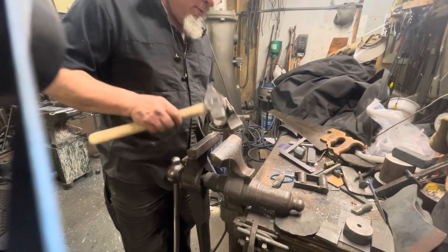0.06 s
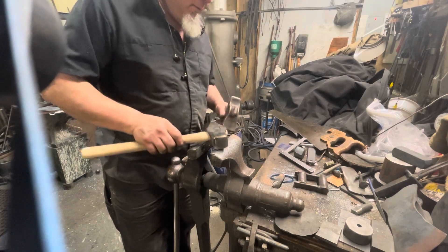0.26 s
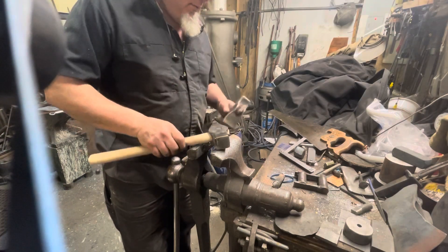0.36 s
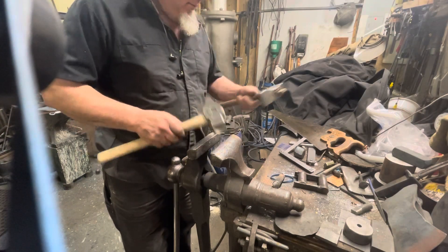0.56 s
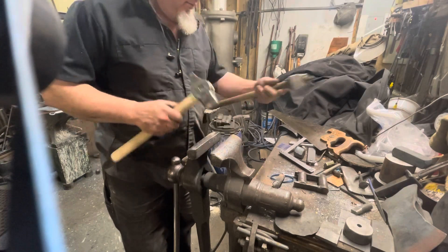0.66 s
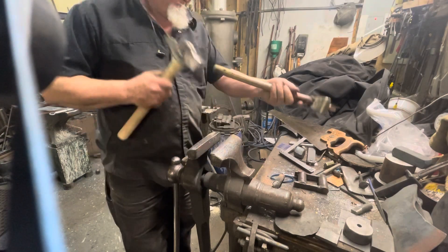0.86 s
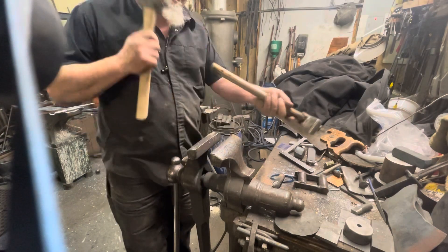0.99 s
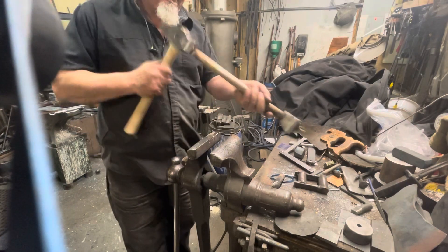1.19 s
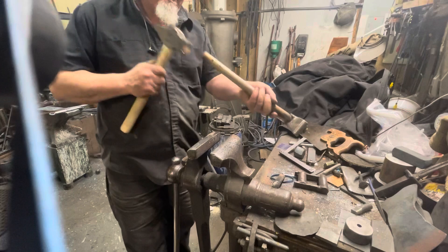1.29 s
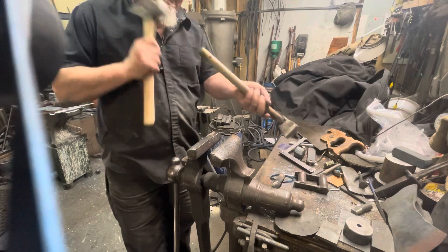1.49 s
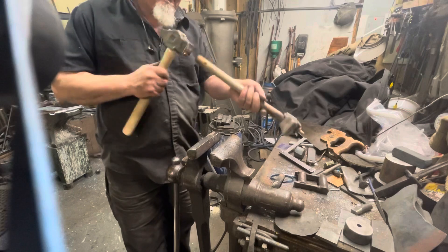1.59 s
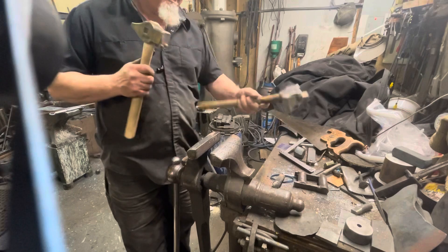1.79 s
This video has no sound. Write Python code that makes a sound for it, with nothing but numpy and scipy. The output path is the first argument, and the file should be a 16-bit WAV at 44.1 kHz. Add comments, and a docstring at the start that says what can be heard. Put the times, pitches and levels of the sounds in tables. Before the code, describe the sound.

Hammer strikes: a quick double steel clank on a vise, then two hard woody knocks in a workshop

```python
"""Mains hum and faint hiss open the scene; then a hammer head clanks twice on a steel vise.
After a tiny bright tick, a second hammer drives a wooden wedge into its handle with two hard blows.
Each stroke sums shaped noise for the contact, decaying sines for the struck bodies, and noise for
scatter and the workshop's reverberation; each blow is a woody knock with a short steel ring.
The recorder's limiter ducks the background after the blows."""
import sys
import numpy as np
from scipy import signal
from scipy.fft import rfft, irfft
from scipy.io import wavfile
from scipy.ndimage import uniform_filter1d, minimum_filter1d

SR = 44100
rng = np.random.default_rng(int(sys.argv[2]) if len(sys.argv) > 2 else 0)


def materialize(psi):
    """Save the field psi as 16-bit PCM at rate SR to the path in sys.argv[1].

    A 1-D psi becomes a single channel; in a 2-D psi each row is a channel.
    """
    bounded = np.clip(np.atleast_2d(psi).T, -1, 1)
    quanta = np.round(bounded * 32767).astype(np.int16)
    wavfile.write(sys.argv[1], SR, quanta)


N = 81585
TIME = np.arange(N) / SR
AGE = TIME[:2 ** 15]  # seconds since a stroke began

# All levels are relative, ahead of the limiter. Noise colours give only the spectral shape.
# background colours: frequency_hz, density_db_per_hz
RUMBLE_COLOUR = [(20, -12.5), (45, -2.5), (90, -1), (135, -4), (200, -15), (320, -17), (450, -6.5),
                 (600, -18), (820, -12.5), (1200, -26.5), (2500, -43.5)]
HISS_COLOUR = [(500, -1.5), (1500, 1.5), (2800, -1), (4400, -2), (5600, -7), (6800, -3.5), (7500, -10),
               (9500, -5), (10800, -14), (13000, -10), (15500, -23)]
# swelling and sinking of the background: time_s, level_db
RUMBLE_LEVEL = [(0, -63), (.65, -60), (.78, -58.5), (1.0, -60.5), (1.09, -63.5), (1.85, -60)]
HISS_LEVEL = [(0, -64.5), (.2, -66.5), (.61, -66.5), (.65, -64), (.75, -62.5), (1.0, -64), (1.07, -69.5),
              (1.5, -58.5), (1.85, -63)]
# mains hum: frequency_hz, rms_level_db
HUM_TONES = [(50, -49.5), (241.5, -77), (479, -73)]
# likeness of left and right: frequency_hz, correlation (no unit)
LIKENESS = [(60, 0.2), (250, .6), (600, -0.13), (1500, 0.078), (4000, 0.034), (8000, -0.087),
            (12000, -0.17)]
# decay time of the workshop: frequency_hz, t60_s
ROOM_T60 = [(150, 0.61), (500, 0.65), (1200, 0.66), (2500, 0.66), (5000, 0.63), (10000, 0.32)]
# steel on the vise: start_s, level_db, tilt_db_per_octave, ring_db, left_right_db
CLANKS = [(0.2449, -13.5, -1.3, -6, 5.5), (0.272, -10, 0, -1.5, 6)]
# hammer head and vise: frequency_hz, level_db, t60_s
VISE_MODES = [(371, -25, .45), (546, -24, .7), (1135, -12, .14), (1314, -19, .35), (1590, -11, .1),
              (1674, -8, .22), (2060, -3, .24), (2105, -13, .3), (2320, -5, .14), (2375, -8, .13),
              (2468, -9, .16), (2880, -12, .14), (3540, -14, .17), (4340, -17, .14), (6960, -18, .06),
              (11930, -31, .22), (12600, -21, .05)]
# bright snap of steel on steel: frequency_hz, density_db_per_hz
SNAP_COLOUR = [(1500, -8.5), (2600, 0.5), (4500, -2.5), (7000, -7.5), (10500, -18), (12800, -3.5),
               (14000, -24.5), (16000, -34.5)]
# dense short resonances of the clank, its scatter from benches and tools, its late reverberation:
# frequency_hz, density_db_per_hz
CLANK_COLOUR = [(80, -31), (160, -16.5), (400, -17.5), (520, -20), (900, -5.5), (1600, -2.5), (2400, -0.5),
                (3100, -4), (4300, -5.5), (5800, -17.5), (9000, -22.5), (10700, -36), (12700, -28.5),
                (14200, -56)]
CLANK_SCATTER = [(120, -35), (350, -5.5), (550, -17.5), (900, 0), (2200, -1), (3000, -0.5), (4400, -7.5),
                 (5800, -17.5), (9000, -22), (11000, -45), (14000, -50)]
CLANK_TAIL = [(80, -12), (150, -3), (280, -10.5), (700, -6), (1400, -2.5), (2150, 3.5), (2900, -11),
              (4300, -10), (6000, -23.5), (9000, -36.5), (14000, -51)]
# blows on the wedge: start_s, level_db, tilt_db_per_octave, steel_ring_db, thud_db, left_right_db
BLOWS = [(1.2019, -1.5, 1.56, -5.5, -16, 4.5), (1.554, -2, -0.37, -6, -23, 4)]
# wedge and handle: frequency_hz, level_db, t60_s
WOOD_MODES = [(379, -14, .1), (425, -17, .05), (545, -17, .05), (627, -10, .08), (768, -11, .07),
              (950, -10, .08), (1043, -6, .1), (1177, -10, .16), (1400, -13, .05), (1660, -15, .06),
              (1850, -12, .07), (1980, -11, .08), (2300, -13, .1), (2450, -13, .09)]
# head of the striking hammer: frequency_hz, level_db, t60_s
STEEL_MODES = [(1233, -26, 1.1), (3050, -14, .05), (3830, -19, .22), (4030, -21, .33), (5160, -15, .12),
               (5905, -7, .06), (6250, -19, .16), (11950, -41, .25)]
# first instant of contact, and the thud through the handle: frequency_hz, density_db_per_hz
CRACK_COLOUR = [(1000, -15), (2500, -16), (4500, -2), (5900, 0.5), (7400, -4), (9000, -14.5), (12800, -6),
                (14300, -24), (16000, -28)]
THUD_COLOUR = [(50, -35), (90, -11), (130, -8), (250, -2), (320, -3.5), (420, 5), (600, 1), (1500, -47)]
# dense short resonances of the knock, its scatter from benches and tools, its late reverberation:
# frequency_hz, density_db_per_hz
KNOCK_COLOUR = [(70, -15), (160, -39), (300, -28), (400, -9), (490, -26), (630, 7), (1050, -4.5),
                (1600, -0.5), (2800, -0.5), (4500, -8), (6500, -6), (7400, -18.5), (8400, -19),
                (10500, -29.5), (12500, -23), (14600, -51)]
KNOCK_SCATTER = [(120, -42), (300, -6), (600, -4), (1150, 1), (1600, 1.5), (2300, -2), (3200, -5.5),
                 (4500, -1.5), (6600, -6.5), (7400, -15.5), (8600, -11.5), (10500, -29.5), (13000, -29),
                 (15000, -52)]
KNOCK_TAIL = [(120, -32), (350, -7), (700, -0.5), (1200, 5), (1600, -3), (2200, -1.5), (3000, -10),
              (4000, -6), (6300, -12), (7600, -18.5), (9000, -17), (11000, -69.5), (15000, -47)]

TICK_S, TICK_DB = 0.641, -59
BENCH_ECHO_S, BENCH_ECHO_DB = 0.0054, -3  # the bench top throws each contact back
LIMIT_DB, LIMIT_HOLD_S, RELEASE_DB_PER_S, LOOK_AHEAD_S = -12, 0.13, 73.5, 0.0033
CUTOFF_HZ = 16600


def from_db(db):
    """Logarithmic level: twenty decibels are a factor of ten in amplitude."""
    return 10 ** (np.asarray(db) / 20)


def at_hz(points, hz):
    """Logarithmic pitch scale: a table is interpolated along log frequency."""
    table_hz, value = np.transpose(points)
    return np.interp(np.log(hz), np.log(table_hz), value)


def frequencies(size):
    """Discrete spectrum: bin frequencies in Hz, floored at 1 to allow logarithms."""
    return np.maximum(np.fft.rfftfreq(size, 1 / SR), 1)


def pan(left_right_db):
    """Interaural level difference: left and right gains at constant mean power."""
    gains = from_db(np.array([[left_right_db], [-left_right_db]]) / 2)
    return gains / np.sqrt(np.mean(gains ** 2))


def place(sound, start_s):
    """Time shift: a sound is set at its start and cut to the scene's length."""
    return np.pad(sound, ((0, 0), (int(start_s * SR), N)))[:, :N]


def noise(colour, tilt_db=0, size=len(AGE)):
    """Partial coherence: shared and opposed noise mix into a coloured stereo field of rms 1."""
    hz = frequencies(size)
    mid, side = rfft(rng.standard_normal((2, size)))
    alike = np.clip(at_hz(LIKENESS, hz), -.99, .99)
    common = np.sqrt(1 + alike) * mid
    opposed = np.sqrt(1 - alike) * side * [[1], [-1]]
    gain = from_db(at_hz(colour, hz) + tilt_db * np.log2(hz))
    sound = irfft(gain * (common + opposed), size)
    return sound / np.std(sound)


def envelope(attack, hold, t60, delay=0):
    """Exponential damping: a straight rise, with decay starting hold seconds after the onset."""
    age = AGE - delay
    rise = np.clip(age / attack, 0, 1)
    return rise * from_db(-60 * np.clip((age - hold) / t60, 0, 4))


def with_echo(attack, hold, t60):
    """Early reflection: the contact and its return from the bench add in power."""
    direct = envelope(attack, hold, t60)
    reflected = envelope(attack, hold, t60, BENCH_ECHO_S)
    return np.hypot(direct, from_db(BENCH_ECHO_DB) * reflected)


def ring(modes, attack):
    """Modal vibration: damped sines of alternating sign, with a phase gap set by stereo likeness."""
    out = 0
    for k, (hz, db, t60) in enumerate(modes):
        gap = np.arccos(np.clip(at_hz(LIKENESS, hz), -1, 1)) * (-1) ** (k // 2)
        wave = np.exp((2j * np.pi * hz - np.log(1000) / t60) * AGE)
        stereo = np.imag(wave * np.exp(.5j * gap * np.array([[1], [-1]])))
        out = out + (-1) ** k * from_db(db) * stereo
    return out * np.minimum(AGE / attack, 1)


def reverberation(colour, build_s):
    """Diffuse decay: noise in overlapping octave bands builds up and dies at each band's rate."""
    spectrum = rfft(noise(colour))
    octave = np.log2(frequencies(len(AGE)))
    centres = 110 * 2. ** np.arange(8)  # Hz
    out = 0
    for hz, pick in zip(centres, np.eye(len(centres))):
        band = irfft(spectrum * np.interp(octave, np.log2(centres), pick))
        out = out + band * envelope(build_s, 0, at_hz(ROOM_T60, hz))
    return out


def background():
    """Stationary tones and drifting noise: steady mains hum under rumble and hiss of varying level."""
    hum = 0
    for hz, db in HUM_TONES:
        hum = hum + from_db(db) * np.sqrt(2) * np.sin(2 * np.pi * (hz * TIME + rng.random()))
    rumble = from_db(np.interp(TIME, *np.transpose(RUMBLE_LEVEL))) * noise(RUMBLE_COLOUR, size=N)
    hiss = from_db(np.interp(TIME, *np.transpose(HISS_LEVEL))) * noise(HISS_COLOUR, size=N)
    return pan(2.1) * hum + pan(2.0) * rumble + pan(0.76) * hiss


def lifting_tick():
    """Light contact: a brief burst of bright noise as the hammer leaves the vise."""
    touch = noise(HISS_COLOUR, tilt_db=13) * envelope(attack=0.0028, hold=0.0036, t60=0.044)
    return from_db(TICK_DB) * place(touch, TICK_S)


def vise_clanks():
    """Impact of steel on steel: the head lands on the vise, bounces once, and excites both bodies."""
    out = 0
    for start_s, db, tilt_db, ring_db, left_right_db in CLANKS:
        snap = from_db(-11) * noise(SNAP_COLOUR) * envelope(attack=0.00058, hold=0.0015, t60=0.0094)
        contact = from_db(-2.5) * noise(CLANK_COLOUR, tilt_db)
        contact = contact * with_echo(attack=0.0027, hold=0.0024, t60=0.078)
        steel = from_db(ring_db) * ring(VISE_MODES, attack=0.0046)
        scatter = from_db(-8.5) * noise(CLANK_SCATTER, tilt_db)
        scatter = scatter * envelope(attack=0.006, hold=0.025, t60=0.23)
        tail = from_db(-14) * reverberation(CLANK_TAIL, build_s=0.015)
        direct = pan(-2.5) * snap + pan(left_right_db) * (contact + steel)
        room = pan(2.5) * scatter + pan(0.8) * tail
        out = out + from_db(db) * place(direct + room, start_s)
    return out


def wedge_blows():
    """Impact on wood: a crack and thud, short wooden modes, and the ringing of the hammer head."""
    out = 0
    for start_s, db, tilt_db, ring_db, thud_db, left_right_db in BLOWS:
        crack = from_db(-3.5) * noise(CRACK_COLOUR) * envelope(attack=0.004, hold=0.0011, t60=0.015)
        knock = from_db(-1.5) * noise(KNOCK_COLOUR, tilt_db)
        knock = knock * with_echo(attack=0.0032, hold=0.003, t60=0.03)
        thud = from_db(thud_db) * noise(THUD_COLOUR) * envelope(attack=0.0046, hold=0.0082, t60=0.072)
        wood = from_db(0.5) * ring(WOOD_MODES, attack=0.0049)
        steel = from_db(ring_db) * ring(STEEL_MODES, attack=0.00036)
        scatter = from_db(-10.5) * noise(KNOCK_SCATTER, tilt_db)
        scatter = scatter * envelope(attack=0.015, hold=0.015, t60=0.15)
        tail = from_db(-17) * reverberation(KNOCK_TAIL, build_s=0.019)
        direct = pan(left_right_db) * (crack + knock + thud + wood) + pan(5) * steel
        room = pan(5.3) * scatter + pan(3.5) * tail
        out = out + from_db(db) * place(direct + room, start_s)
    return out


def scene():
    """Superposition: the pressures of the background and all strokes add."""
    return background() + lifting_tick() + vise_clanks() + wedge_blows()


def limiter(x):
    """Gain reduction: turns down just ahead of loud sound, holds, then recovers at a steady dB rate."""
    power = uniform_filter1d(np.mean(x ** 2, axis=0), size=400)
    over_db = np.maximum(10 * np.log10(np.maximum(power, 1e-12)) - LIMIT_DB, 0)
    hold = max(int(LIMIT_HOLD_S * SR), 1)
    # the largest excess of the hold time just past
    held_db = -minimum_filter1d(-over_db, hold, origin=(hold - 1) // 2, mode="nearest")
    release_db = RELEASE_DB_PER_S * TIME
    cut_db = np.maximum.accumulate(held_db + release_db) - release_db
    ahead_db = np.interp(TIME + LOOK_AHEAD_S, TIME, cut_db)
    return x * from_db(-uniform_filter1d(ahead_db, size=130))


def record(dry):
    """Limited dynamic range and bandwidth: limiter, full-scale ceiling, then a steep low-pass."""
    limited = np.clip(limiter(dry), -1, 1)
    top_cut = signal.cheby2(18, 80, CUTOFF_HZ, fs=SR, output="sos")
    return signal.sosfilt(top_cut, limited)


dry = scene()
out = record(dry)
materialize(out)
```